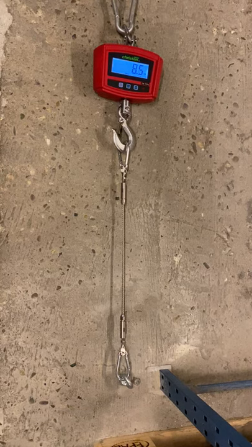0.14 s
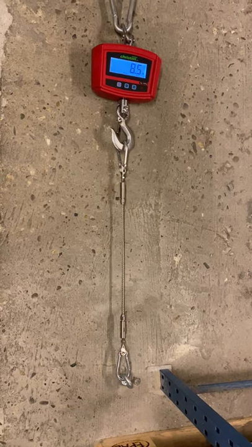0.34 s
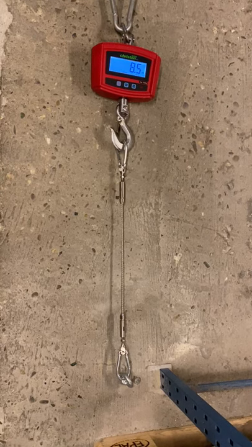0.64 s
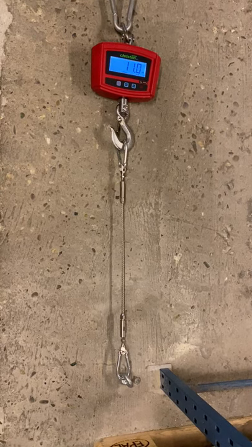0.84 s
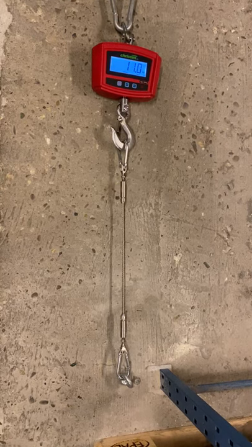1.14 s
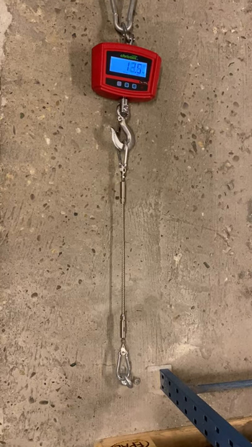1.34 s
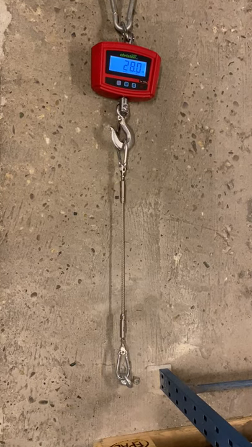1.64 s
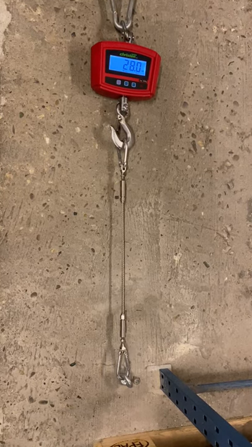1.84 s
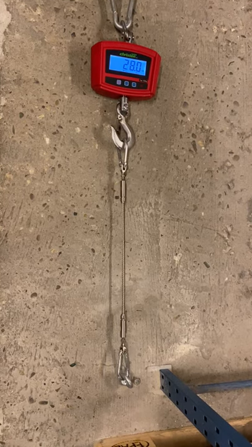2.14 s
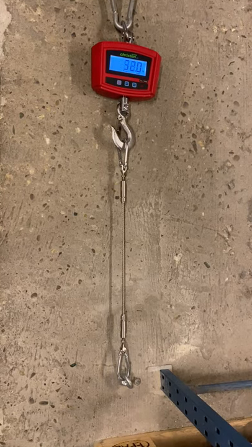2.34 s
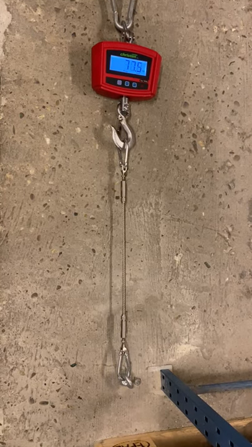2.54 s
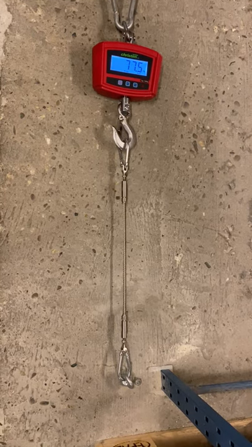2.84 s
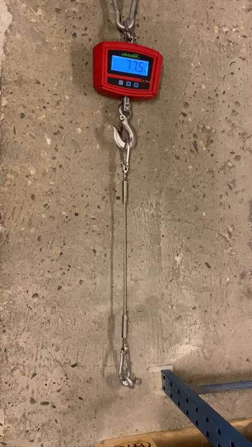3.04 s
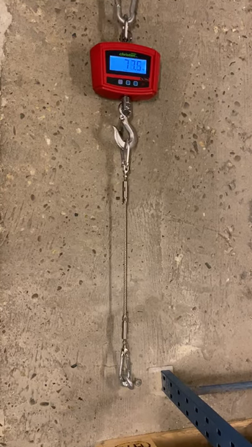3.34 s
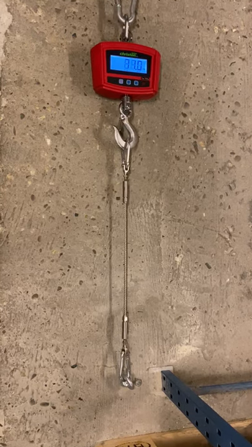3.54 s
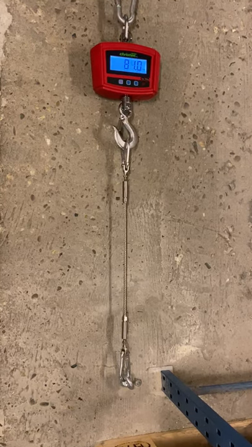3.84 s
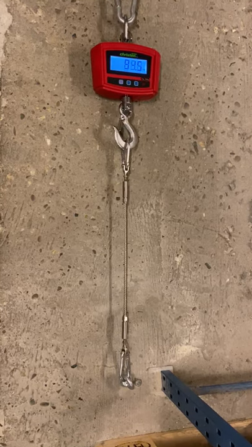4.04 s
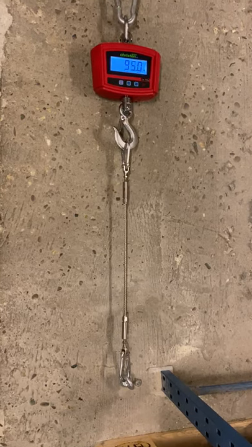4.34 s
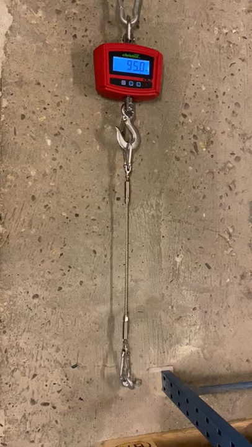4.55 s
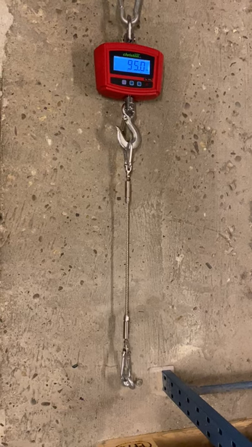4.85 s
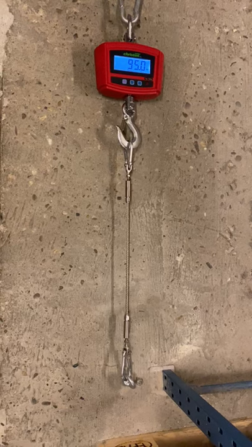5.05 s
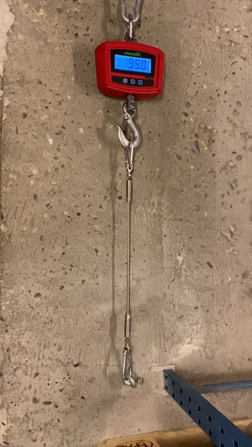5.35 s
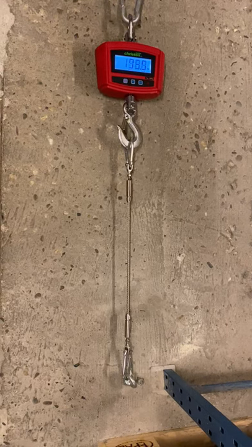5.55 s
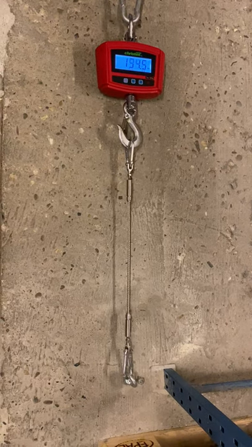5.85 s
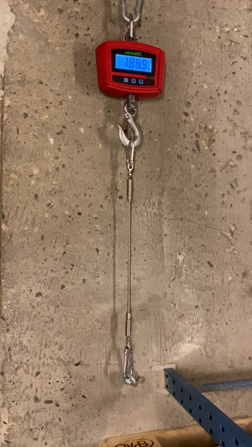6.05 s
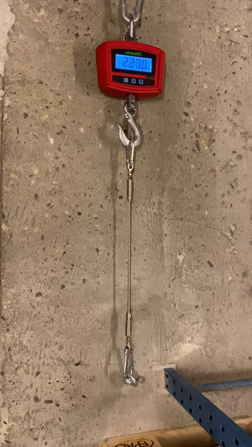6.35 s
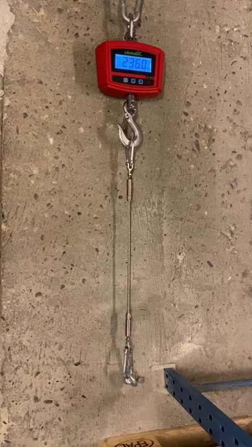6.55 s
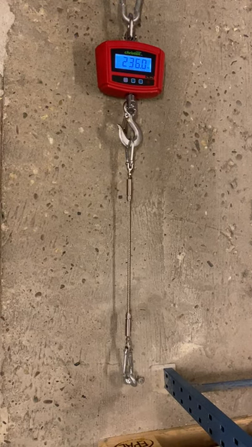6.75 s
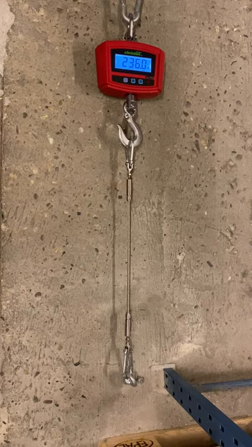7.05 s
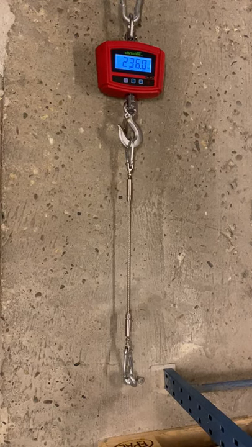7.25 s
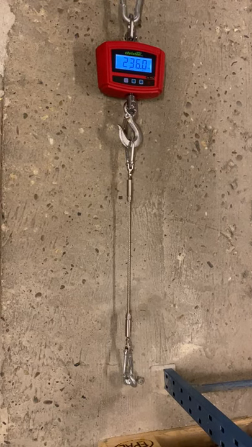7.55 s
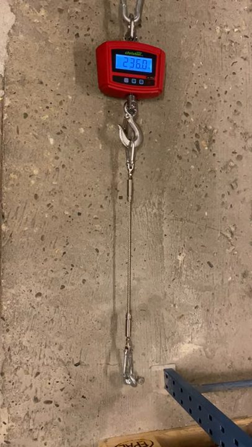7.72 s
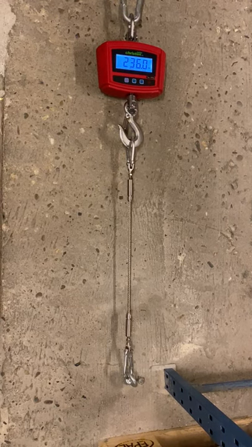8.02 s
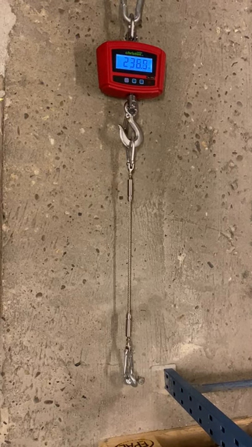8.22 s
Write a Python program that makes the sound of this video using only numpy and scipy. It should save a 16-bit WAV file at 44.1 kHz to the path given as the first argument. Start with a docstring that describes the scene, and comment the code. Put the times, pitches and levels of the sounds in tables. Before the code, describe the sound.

Bright steel ratchet clicks crack in quick uneven runs, a taut cable end slips with a bang, then sparser clicks and a final hook snap.

```python
"""A hoist pulls a steel cable tight in a small concrete room, heard through a phone's two microphone ports.
Over a low rumble with faint rubbing and chain chatter, pawl and chain click in runs of bright cracks.
Dull handling bumps fall among them; near 3.2 s the loaded cable eye slips with a bang and rattles.
The frame thrums low as it settles, clicks come more sparsely, and near 8.3 s the hook snaps over.
Metal is shaped noise plus decaying sines; decaying noise makes the room's reflections."""
import sys
import numpy as np
from scipy import signal
from scipy.fft import rfft, irfft, next_fast_len
from scipy.io import wavfile

SR = 44100
rng = np.random.default_rng(int(sys.argv[2]) if len(sys.argv) > 2 else 0)


def generate_wav(sig):
    """Save sig (samples, or channels by samples) to the path in sys.argv[1] as 16-bit PCM at SR."""
    pcm = np.round(np.clip(np.atleast_2d(sig).T, -1, 1) * 32767).astype(np.int16)
    wavfile.write(sys.argv[1], SR, pcm)


N = 369558

# drops of the pawl: (time [s], level [dB], tilt [dB per octave], top ring relative to the level [dB])
PAWL_CLICKS = [(.002, -23, 4.5, -19), (.0309, -14.5, 2.5, -23), (.177, -37.5, -3.5, -26),
               (.217, -40, -6, -19.5), (.262, -14, 4, -4.5), (.314, -13, 5.5, -12),
               (.5166, -29, 2.5, -12.5), (0.574, -31, -3, -28), (0.6223, -11, 6.5, -25),
               (.728, -14.5, 3.5, -22), (.8808, -39.5, 2, -16), (.941, -28, 4, -19.5),
               (.951, -16.5, 2.5, -11), (1.0612, -15.5, 1, -11), (1.251, -31.5, 2, -14),
               (1.302, -35.5, 0, -30), (1.332, -35.5, -2, -31), (1.479, -12.5, 4, -26),
               (1.556, -16, 4, -17), (1.844, -31, 4, -9), (1.857, -15, 2.5, -12), (2.017, -34, 2.5, -11),
               (2.039, -18, 0, -17), (2.256, -40, -1.5, -41), (2.507, -40.5, -7, -40),
               (2.5523, -12, 3, -23), (2.647, -12.5, 3, -18.5), (2.8393, -46, -3.5, -40),
               (2.9726, -43, 0.5, -21), (3.052, -47, -3, -24), (3.212, -28, 1, -13),
               (3.482, -41.5, -3, -23), (3.612, -33, -0.5, -21), (3.641, -25, 4, -15),
               (3.65, -18.5, 0, -17), (3.831, -45.5, 1.5, -24), (3.8796, -39, -3.5, -34),
               (3.9783, -38, -6, -31), (4.111, -11, 5.5, -21), (4.1908, -16.5, 3.5, -20),
               (4.498, -41.5, -8.5, -39), (5.089, -52, -4, -28), (5.4013, -34.5, 4, -20),
               (5.429, -35.5, 3, -22.5), (5.447, -36.5, -4, -24), (5.467, -27, -0.5, -21),
               (5.477, -21, .5, -20), (5.959, -36.5, 2.5, -21.5), (6.051, -31, 2.5, -20),
               (6.085, -26, 4, -18), (6.1755, -20, 1, -22.5), (6.2843, -37.5, -0.5, -20.5),
               (6.536, -44, -8.5, -37), (6.73, -35.5, -0.5, -25.5), (6.744, -13, 3, -19),
               (6.864, -37, 1, -19), (6.923, -33, 1.5, -23), (7.02, -34.5, 1, -26), (7.036, -31, -1, -18),
               (7.109, -30.5, 0, -29), (7.118, -33, .5, -32), (7.359, -46.5, 7.5, -20.5),
               (7.653, -44.5, -5.5, -37), (8.2316, -40, 8, -16)]
# effort on the lever, before offsets and wavering: (time [s], level [dB])
LEVER_EFFORT = [(0.0, -57), (0.07, -55), (1.05, -60), (1.49, -57), (2.15, -62), (2.57, -64), (2.78, -59),
                (2.99, -63), (3.2, -64.5), (3.36, -46.5), (3.69, -66), (4.15, -57.5), (4.43, -62.5),
                (4.67, -71.5), (5.02, -73.5), (5.3, -60), (5.67, -74), (6.25, -60.5), (6.35, -67),
                (6.6, -72.5), (6.74, -64), (7.49, -62), (7.98, -73), (8.38, -72)]
# thud of the floor under shifting weight: (frequency [Hz], gain [dB])
FLOOR_SHAPE = [(70, -11.5), (120, -1.5), (185, 0.5), (260, -12.5)]


def undb(db):
    """Decibels to gain."""
    return 10 ** (np.asarray(db) / 20)


def unit(x):
    """Scale to rms 1."""
    return x / np.sqrt(np.mean(x ** 2))


def attack_unit(x):
    """Scale so that the first 4 ms have rms 1."""
    return x / np.sqrt(np.mean(x[..., :SR // 250] ** 2))


def curve(points, s):
    """Read (s, value) points at the times s."""
    return np.interp(s, *np.transpose(points))


def lookup(points, hz):
    """Read (Hz, value) points on a log-frequency axis."""
    f, value = np.transpose(points)
    return np.interp(np.log(np.maximum(hz, 1)), np.log(f), value)


def freqs(n):
    """Frequencies of the spectrum of n samples."""
    return np.arange(n // 2 + 1) * SR / n


def colour(x, points, tilt_db=0):
    """Causal filter with the (Hz, dB) shape, tilted per octave and falling steeply beyond its ends."""
    n = next_fast_len((x.shape[-1] + 2048) // 2) * 2
    hz = np.maximum(freqs(n), 10)
    below = np.maximum(points[0][0] / hz, 1)
    above = np.maximum(hz / points[-1][0], 1)
    octaves_outside = np.log2(below * above)
    tilt = tilt_db * np.log2(np.clip(hz, 200, 12000) / 3000)
    db = lookup(points, hz) + tilt - 18 * octaves_outside
    # folding the cepstrum forward in time gives minimum phase
    cepstrum = irfft(np.log(undb(db)), n)
    cepstrum[1:n // 2] *= 2
    cepstrum[n // 2 + 1:] = 0
    response = np.exp(rfft(cepstrum))
    return irfft(rfft(x, n) * response, n)[..., :x.shape[-1]]


def fade(t, t60):
    """Exponential decay, 60 dB down at t60."""
    return np.exp(-np.log(1000) * t / t60)


def add(track, s, sound):
    """Mix a sound into a track at time s."""
    i = max(int(s * SR), 0)
    track[..., i:i + sound.shape[-1]] += sound[..., :max(N - i, 0)]


def diffuse(a, b):
    """Two unrelated signals become sound from all sides, partly alike at the two ports."""
    # how alike the ports hear it: (frequency [Hz], likeness [0-1])
    likeness = [(130, 1), (400, 0.91), (800, 0.81), (1400, 0.52), (2200, 0.88), (3000, 0.28), (4800, 0.72),
                (6000, 0.95), (7300, 1), (8600, 0.98), (10300, 0.99), (12000, 0.96), (13500, 0.98),
                (15000, 0.95)]
    like = np.clip(lookup(likeness, freqs(len(a))), 0, 1)
    mid = irfft(rfft(a) * np.sqrt((1 + like) / 2), len(a))
    side = irfft(rfft(b) * np.sqrt((1 - like) / 2), len(a))
    return np.array([mid + side, mid - side])


def ring(modes, t, scatter_db):
    """Decaying modes along two sound paths; each blow lands elsewhere and weighs them anew."""
    hz, db, t60 = np.transpose(modes)[:, :, None]
    weight, detune, *phase = rng.standard_normal((4, len(modes), 1))
    size = undb(db + scatter_db * weight)
    waves = np.sin(2 * np.pi * (hz * (1 + 0.0037 * detune) * t + np.array(phase)))
    return (size * fade(t, t60) * waves).sum(1) / np.sqrt(np.sum(size ** 2) / 2)


def crack(t, shape, tilt_db, contact_s, t60):
    """Metal grinds for the contact time, then its dense resonances die away; two sound paths."""
    burst = rng.standard_normal((2, len(t))) * fade(np.maximum(t - contact_s, 0), t60)
    return attack_unit(colour(burst, shape, tilt_db))


def grains(spread_db):
    """Dense tiny contacts of uneven size, about 1500 a second, along two sound paths."""
    struck = rng.random(N) < 1500 / SR
    size = undb(spread_db * np.minimum(rng.exponential(size=N), 6))
    return rng.standard_normal((2, N)) * struck * size


def waver(rate, depth_db):
    """A gain that wanders at random, rate times a second."""
    steps = rng.standard_normal(512)
    return undb(depth_db * np.interp(np.arange(N) / SR * rate, np.arange(len(steps)), steps))


def shaking():
    """Motion of the slack chain: kicked by each pawl drop, then dying away."""
    shake_db, shake_t60_s = -38, .5
    out, t = np.zeros(N), np.arange(SR) / SR
    for s, db, *_ in PAWL_CLICKS:
        add(out, s, undb(db + shake_db) * fade(t, shake_t60_s))
    return out


def handling():
    """A low rumble; effort drives floor thudding, lever rubbing and chatter of the slack chain."""
    # rumble of building and rig: (frequency [Hz], gain [dB])
    rumble_shape = [(20, -18.5), (40, -9), (62, 1.5), (110, -5), (180, -9.5), (300, -21.5), (600, -49)]
    # its level before a lift and wavering: (time [s], level [dB])
    rumble_level = [(0.0, -58), (0.07, -60), (1.8, -58.5), (2.05, -60), (2.8, -55), (3.01, -61.5),
                    (3.22, -62.5), (3.34, -57), (3.73, -51.5), (4.43, -56), (4.64, -61), (4.88, -62),
                    (5.34, -57.5), (5.58, -62), (6.16, -64.5), (7.16, -54.5), (8.12, -64.5), (8.38, -64)]
    # rubbing of the lever: (frequency [Hz], gain [dB])
    rubbing_shape = [(120, -10), (220, -1.5), (390, 4), (530, -7), (750, -7), (1300, -14), (2500, -13),
                     (5000, -32)]
    # chatter of the slack chain: (frequency [Hz], gain [dB])
    chatter_shape = [(900, -16), (2300, -3.5), (4000, 1.5), (6000, -2.5), (10500, -2.5), (13000, -6.5),
                     (14300, -14), (15500, -14.5), (16500, -25)]
    rumble_lift_db = 1.5
    floor_db, rub_db, chatter_db = -5.5, -1, -11.5  # relative to the effort
    chatter_rest_db = -78  # chain chatter without effort or clicks
    t = np.arange(N) / SR
    effort = undb(curve(LEVER_EFFORT, t)) * waver(rate=14, depth_db=1.5)
    rumble = undb(curve(rumble_level, t) + rumble_lift_db) * waver(rate=9.6, depth_db=0.5)
    low = rumble * unit(colour(rng.standard_normal((2, N)), rumble_shape))
    floor = undb(floor_db) * effort * unit(colour(grains(2.4), FLOOR_SHAPE))
    rub = undb(rub_db) * effort * unit(colour(grains(3.7), rubbing_shape))
    chain_motion = undb(chatter_db) * effort + shaking() + undb(chatter_rest_db)
    chain = chain_motion * unit(colour(grains(1.1), chatter_shape))
    return diffuse(*(low + floor)), diffuse(*(rub + chain))


def loose_links():
    """Faint ticks at random moments, stronger while the lever is worked; rows like those of PAWL_CLICKS."""
    links_per_s, link_db, spread_db = 3, 9, 3
    when, size = rng.random((int(links_per_s * N / SR), 2)).T
    s = when * N / SR
    db = curve(LEVER_EFFORT, s) + link_db + spread_db * (2 * size - 1)
    return [(at, level_db, -2.5, -26) for at, level_db in zip(s, db)]


def clicks():
    """Pawl drops and loose links: a bright crack, clear modes, a very high ring and a housing knock."""
    # dense steel resonances: (frequency [Hz], gain [dB])
    steel_shape = [(1200, -16), (1750, -10), (2400, 0), (3300, 0), (5000, 2.5), (6500, 0), (8000, 1.5),
                   (10500, -0.5), (13000, -4), (14300, -12), (16500, -24.5)]
    # clear modes of pawl and links: (frequency [Hz], gain [dB], t60 [s])
    pawl_modes = [(2325, -7.5, 0.1), (3555, -8, 0.073), (5230, -9, 0.038), (5860, -4.5, 0.11),
                  (8890, 3.5, 0.14), (9900, -5, 0.057), (10730, 7, 0.067), (10900, -7.5, .05)]
    top_hz = 15480
    top_shape = [(top_hz - 900, -40), (top_hz - 250, -12), (top_hz, 0),
                 (top_hz + 200, -8), (top_hz + 600, -25), (19000, -60)]
    housing_shape = [(150, -7.0), (400, -3.5), (800, -1.5), (1400, -3), (3000, -22.5)]
    # the housing knocks less, relative to the crack, the firmer the click
    firm_db, firm_knock_db, knock_per_db = -13, -27.5, -0.36
    # only firm clicks scuff the tooth before the pawl drops
    scuff_lead_s, scuff_db, scuff_above_db = .006, -16.5, -20
    out, t = np.zeros((2, N)), np.arange(SR // 8) / SR
    bite = 1 - np.exp(-t / 0.00027)  # the tooth takes a moment to seat
    for s, db, tilt_db, ring_db in PAWL_CLICKS + loose_links():
        knock_db = firm_knock_db + knock_per_db * (db - firm_db)
        # no two teeth are struck alike
        shape = [(hz, gain_db + 2.9 * rng.standard_normal()) for hz, gain_db in steel_shape]
        steel = crack(t, shape, tilt_db, contact_s=0.0028, t60=0.027)
        modes = undb(-16.0) * ring(pawl_modes, t, scatter_db=4.5)
        top = undb(ring_db) * crack(t, top_shape, 0, contact_s=.001, t60=.06)
        knock = undb(knock_db) * crack(t, housing_shape, 0, contact_s=0.001, t60=0.022)
        if db > scuff_above_db:
            scuff = crack(t, shape, tilt_db=0.5, contact_s=0.0068, t60=0.053)
            add(out, s - scuff_lead_s, undb(db + scuff_db) * bite * scuff)
        add(out, s, undb(db) * bite * (steel + modes + top + knock))
    return diffuse(*out)


def bumps():
    """Soft contacts thud, wake a hollow note and the floor; quick taps stop short, slow shuffles scrape."""
    # bumps of the person at the hoist: (time [s], level [dB], contact [s], hollow ring [dB])
    touches = [(.151, -52.5, 0.0025, 7.5), (.354, -41, 0.0012, -19.5), (.425, -42, 0.011, -15),
               (.574, -37, 0.0049, -9.5), (0.724, -36.5, 0.0023, -14), (1.231, -42, 0.0093, 0),
               (1.405, -47.5, 0.0032, -13), (1.542, -35, 0.0027, -37), (1.594, -39.5, 0.0031, -28),
               (1.857, -51, 0.0059, 10.5), (2.207, -53, .01, 4), (2.264, -52.5, 0.038, -1.5),
               (2.554, -34.5, .005, -3), (2.649, -34.5, 0.0049, -11), (2.86, -50, 0.072, 7.5),
               (3.43, -49.5, 0.045, -8), (3.534, -42.5, 0.0029, -10), (3.887, -53, 0.02, 1),
               (4.177, -45, .0054, 3.5), (4.498, -41, .0079, -1), (4.536, -48.5, .004, -10),
               (4.827, -64.5, 0.014, 0), (5.09, -59, 0.034, 6), (5.134, -48.5, 0.014, -4),
               (5.27, -55.5, 0.07, -10), (5.859, -52, 0.011, -14.5), (6.175, -37, .0028, -19.5),
               (6.563, -39, 0.017, -10.5), (6.751, -46.5, 0.012, 1), (7.131, -56, 0.016, 12.5),
               (7.422, -57, 0.036, -3), (7.51, -57, 0.043, -13), (7.598, -50, 0.0089, -9),
               (7.656, -46, 0.0082, 10), (7.92, -60, 0.039, 5)]
    # scraping: (frequency [Hz], gain [dB])
    scrape_shape = [(700, -8), (1200, -2.5), (2300, -0.5), (3300, -3.5), (5000, -14)]
    # the longer a contact, the more it scrapes, up to the full time
    scrape_db, scrape_full_s = -9.5, 0.0343
    # upper edge of a quick tap; longer contacts are duller by this power
    tap_s, tap_edge_hz, dulling = 0.0032, 910, .17
    floor_db, floor_t60_s = -11, 0.19
    hollow_modes = [(391.5, 3.5, 0.21), (305, -5.5, 0.38), (434, -7.5, 0.11)]  # Hz, dB, t60 s
    out, t = np.zeros((2, N)), np.arange(SR // 4) / SR
    onset = 1 - np.exp(-t / 0.0013)

    def noise(shape):
        """Shaped noise of rms 1 along two sound paths."""
        return unit(colour(rng.standard_normal((2, len(t))), shape))

    for s, db, contact_s, hollow_db in touches:
        edge_hz = tap_edge_hz * (tap_s / contact_s) ** dulling
        thud = noise([(130, -8), (edge_hz / 2, 0), (edge_hz, -2), (2 * edge_hz, -14), (4 * edge_hz, -23)])
        scrape = undb(scrape_db) * min(contact_s / scrape_full_s, 1) * noise(scrape_shape)
        touch = fade(np.maximum(t - contact_s, 0), .024 + 2 * contact_s)
        hollow = undb(hollow_db) * ring(hollow_modes, t, scatter_db=-1)
        floor = undb(floor_db) * noise(FLOOR_SHAPE) * fade(t, floor_t60_s)
        add(out, s, undb(db) * onset * (touch * (thud + scrape) + hollow + floor))
    return diffuse(*out)


def bangs(blows, shape, modes, modes_db, t60):
    """Loaded steel lets go: heavy cracks that set the part ringing."""
    out, t = np.zeros((2, N)), np.arange(SR // 3) / SR
    for s, db, tilt_db in blows:
        body = crack(t, shape, tilt_db, contact_s=0.0056, t60=t60)
        ringing = undb(modes_db) * ring(modes, t, scatter_db=-1.5)
        add(out, s, undb(db) * (body + ringing))
    return diffuse(*out)


def eye_slips():
    """The cable eye slips on its anchor and rattles, each blow a crack with ringing modes."""
    # blows: (time [s], level [dB], tilt [dB per octave])
    slips = [(3.1755, -9, 1.5), (3.1815, -9.5, -1), (3.187, -17.5, 8), (3.193, -16, -3), (3.245, -21.5, 0),
             (3.258, -27.5, 1), (3.290, -25.5, -1), (3.305, -27, 0), (3.311, -27, -1.5), (3.325, -29, -0.5)]
    # dense resonances of eye and anchor: (frequency [Hz], gain [dB])
    eye_shape = [(35, -17), (100, -10.5), (200, -7.5), (265, -11), (330, 4), (390, 5), (700, 4),
                 (1100, -2.5), (2800, -1), (4500, -12), (7000, -15), (12000, -19.5), (16000, -28)]
    # their clear modes: (frequency [Hz], gain [dB], t60 [s])
    eye_modes = [(388, 0.5, 0.53), (465, 1, 0.19), (644, 1, 0.091), (750, -5.5, .1), (844, -4, 0.079),
                 (1120, -1.5, 0.058), (1400, -5.5, 0.085), (1890, -8, 0.11), (2070, -7, 0.12),
                 (2890, -9.5, .09)]
    return bangs(slips, eye_shape, eye_modes, modes_db=-10.0, t60=0.046)


def thrums():
    """The loaded frame swings briefly at a low pitch as it settles: decaying sines."""
    # low notes: (time [s], level [dB], pitch [Hz], t60 [s])
    notes = [(3.186, -24, 95.2, 0.12), (3.644, -36.5, 62.4, 0.56), (3.721, -37.5, 65.5, 0.59),
             (4.501, -44.5, 167, 0.23), (6.564, -45.5, 125.6, 0.25), (6.754, -41, 109.3, 0.45),
             (7.125, -42.5, 111.1, 0.41), (7.191, -51.5, 83, 0.72), (8.262, -29.5, 111.7, 0.12)]
    out, t = np.zeros(N), np.arange(SR // 2) / SR
    onset = 1 - np.exp(-t / 0.0013)
    for s, db, hz, t60 in notes:
        swing = np.sqrt(2) * np.sin(2 * np.pi * hz * t)
        add(out, s, undb(db) * swing * fade(t, t60) * onset)
    return out


def hook_snaps():
    """The hook snaps into a new seat, each blow a crack with ringing modes."""
    # blows: (time [s], level [dB], tilt [dB per octave])
    snaps = [(8.2552, -14.5, 1.5), (8.2572, -23, -1), (8.263, -27.5, 1), (8.277, -27, -2)]
    # dense resonances of the hook: (frequency [Hz], gain [dB])
    hook_shape = [(50, -3), (120, -0.5), (350, 6), (600, -3.5), (1050, 4), (2300, 3.5), (3000, -1.5),
                  (4200, -15), (5200, -3.5), (6500, -7.5), (8000, -12.5), (15500, -23.5)]
    # its clear modes: (frequency [Hz], gain [dB], t60 [s])
    hook_modes = [(396.3, -6.5, 0.19), (1006, -2, 0.08), (1558, -0.5, 0.077), (2277, -15, 0.27),
                  (2395, -14, 0.22), (3440, -8, 0.055), (4560, 2, 0.018), (5500, -15, .03), (6270, 1, .03)]
    return bangs(snaps, hook_shape, hook_modes, modes_db=-1, t60=0.036)


def room(x, build_s, wet_db):
    """Reflections from bare walls build up after the direct sound; the lowest band lingers longest."""
    # decay of the concrete room: (frequency [Hz], t60 [s])
    decay = [(80, 0.67), (400, 0.2), (1000, 0.27), (3000, 0.22), (6000, 0.18), (10000, 0.16), (16000, .14)]
    t = np.arange(SR // 2) / SR
    hz = freqs(len(t))
    spectra = rfft(diffuse(*rng.standard_normal((2, len(t)))))
    tail = 0
    for k, (_, t60) in enumerate(decay):
        share = lookup([(f, j == k) for j, (f, _) in enumerate(decay)], hz)  # overlapping bands
        tail = tail + irfft(spectra * share, len(t)) * fade(t, t60)
    tail = tail * (1 - np.exp(-(t / build_s) ** 2))
    tail *= undb(wet_db) / np.sqrt(np.sum(tail ** 2) / 2)
    return x + signal.fftconvolve(x[:1], tail, axes=1)[:, :N]


def scene():
    """Hoist, rigging and handling, each at its own distance in the room; rumble and thrums stay dry."""
    low, rustle = handling()
    hoist = room(clicks(), build_s=0.0079, wet_db=-4.5)
    person = room(bumps() + rustle, build_s=0.0043, wet_db=-4.0)
    eye = room(eye_slips(), build_s=0.0031, wet_db=-8)
    hook = room(hook_snaps(), build_s=0.0052, wet_db=-7.0)
    return low + thrums() + hoist + eye + hook + person


def record(dry):
    """The two ports hear each frequency with their own phase and level; peaks are rounded, the top cut."""
    # lead of the left port: (frequency [Hz], phase [rad])
    port_phase = [(20, 0.5), (500, -.3), (1050, -.9), (2000, 0), (3100, 1.1), (3800, 0), (4900, -.4),
                  (5700, 1), (7300, 3.14), (10300, 5.86), (13500, 9.18), (16000, 12.49)]
    # left minus right port: (frequency [Hz], level [dB])
    port_balance = [(120, -0.5), (280, 1.5), (500, 3), (1000, 1.4), (2000, 0), (4000, -0.56), (8000, 0.1)]
    cutoff_hz = 16300
    hz = freqs(N)
    balance = undb(lookup(port_balance, hz) / 2)
    lag = np.exp(-1j * lookup(port_phase, hz))
    ports = irfft(rfft(dry) * np.array([balance, lag / balance]), N)
    lowpass = signal.ellip(8, .2, 70, cutoff_hz, fs=SR, output="sos")
    return signal.sosfilt(lowpass, np.tanh(ports))


dry = scene()
out = record(dry)
generate_wav(out)
```